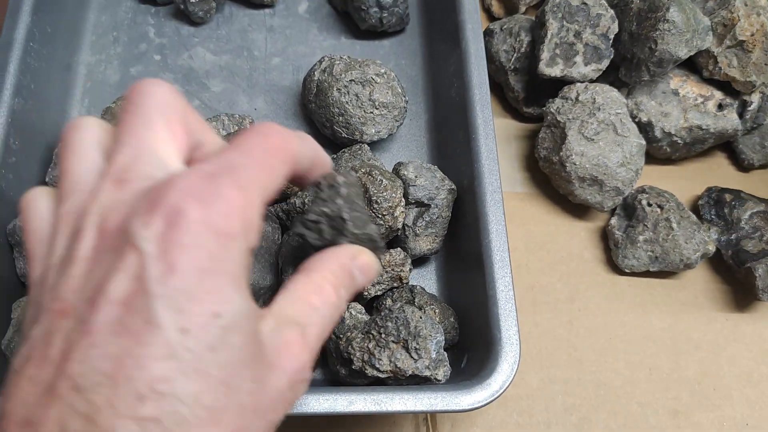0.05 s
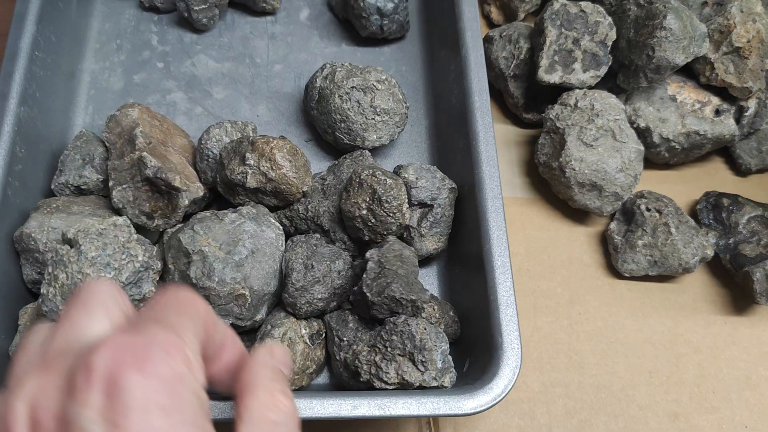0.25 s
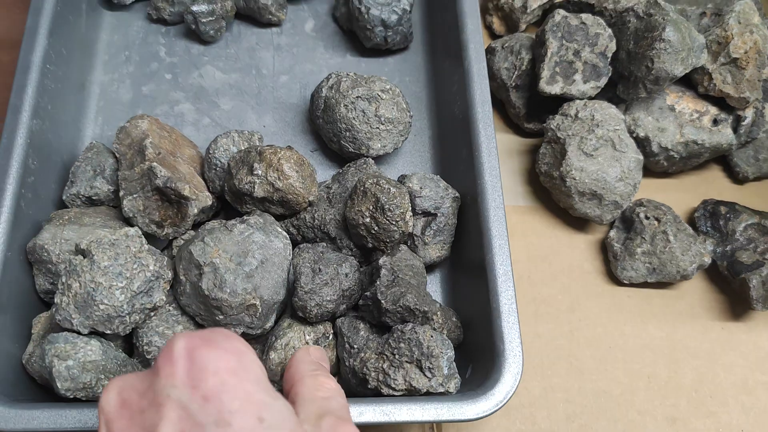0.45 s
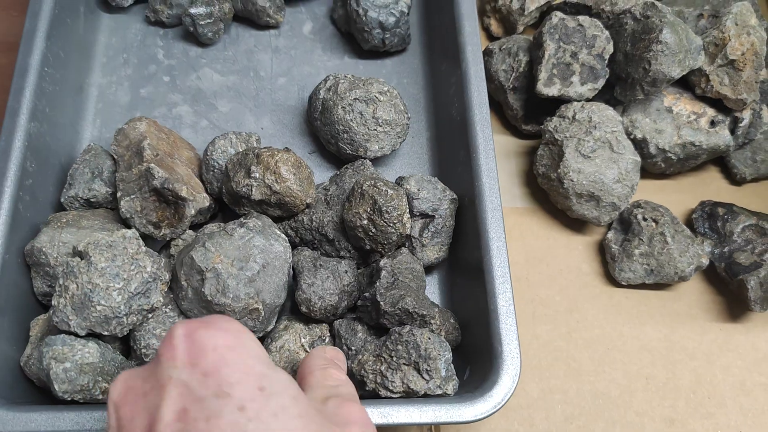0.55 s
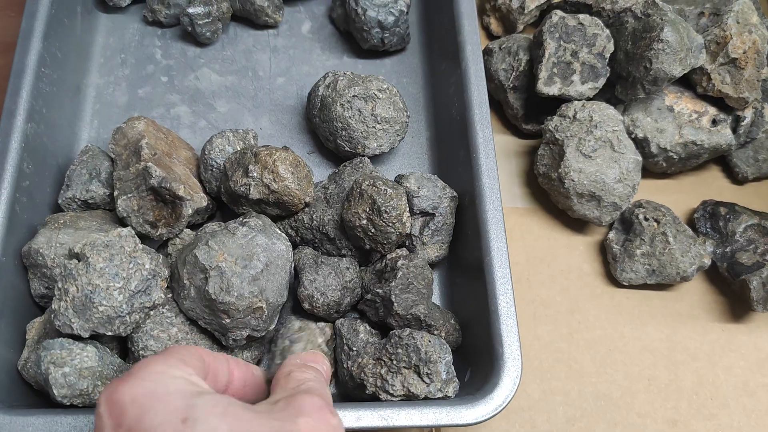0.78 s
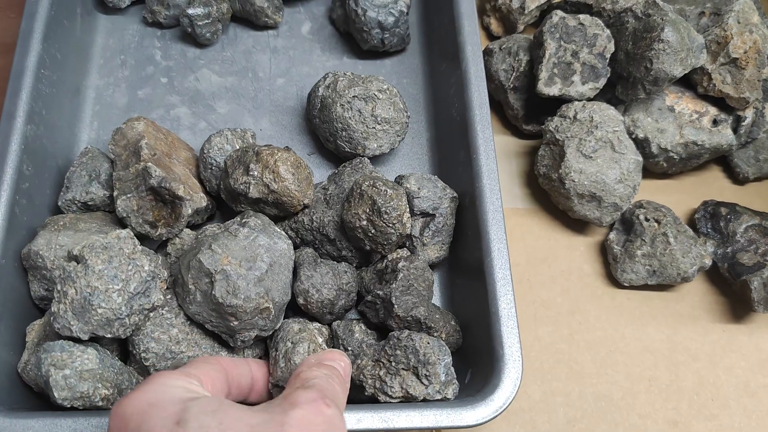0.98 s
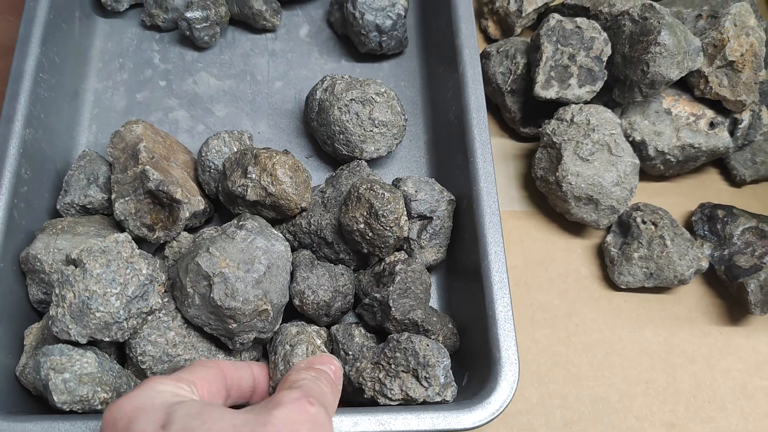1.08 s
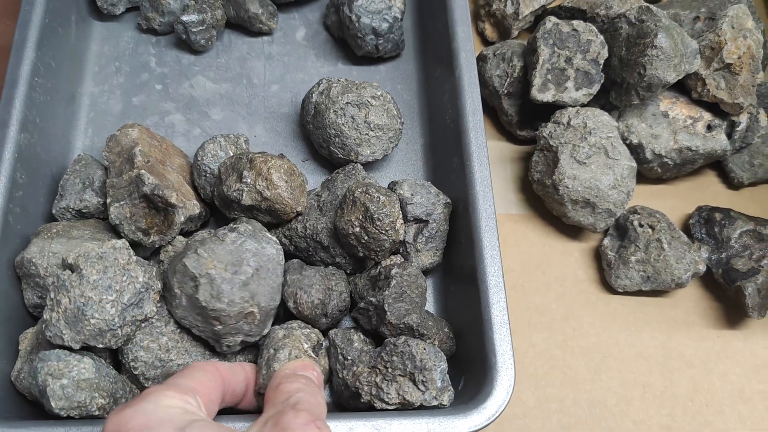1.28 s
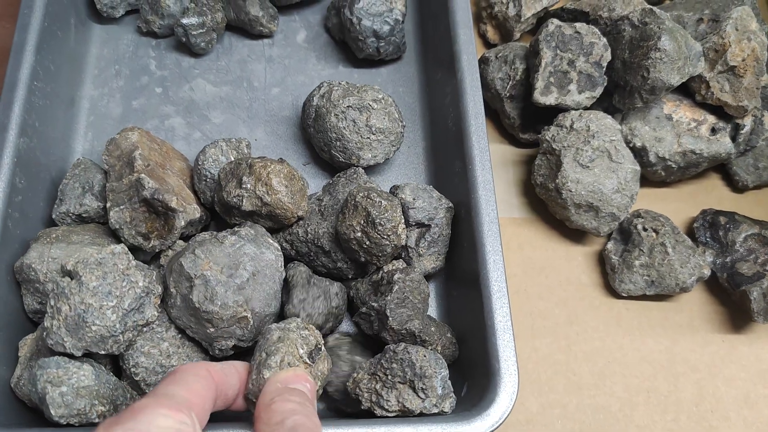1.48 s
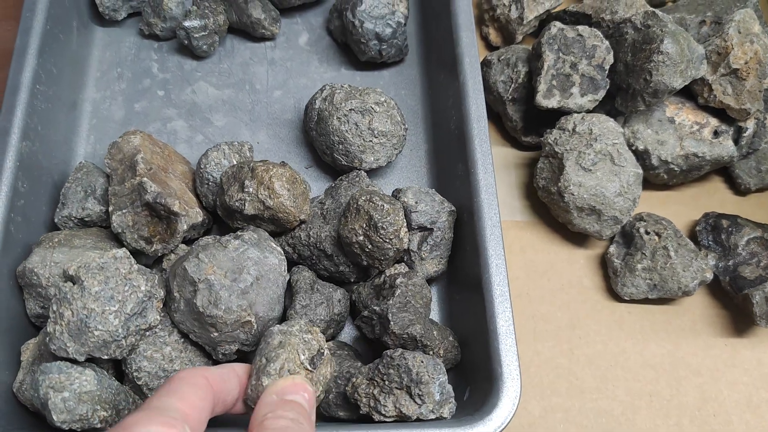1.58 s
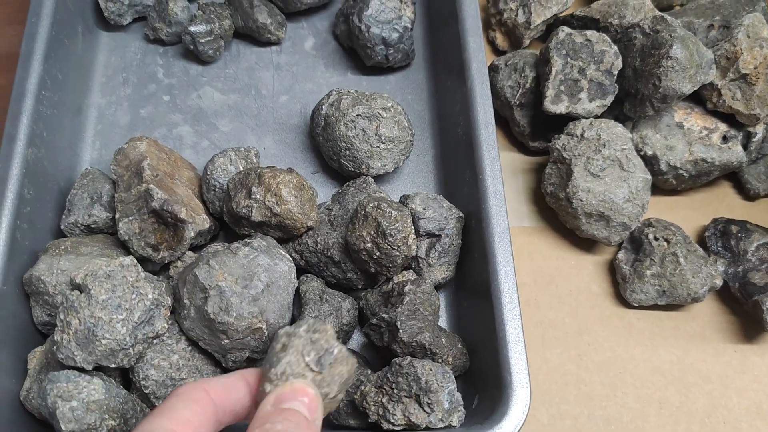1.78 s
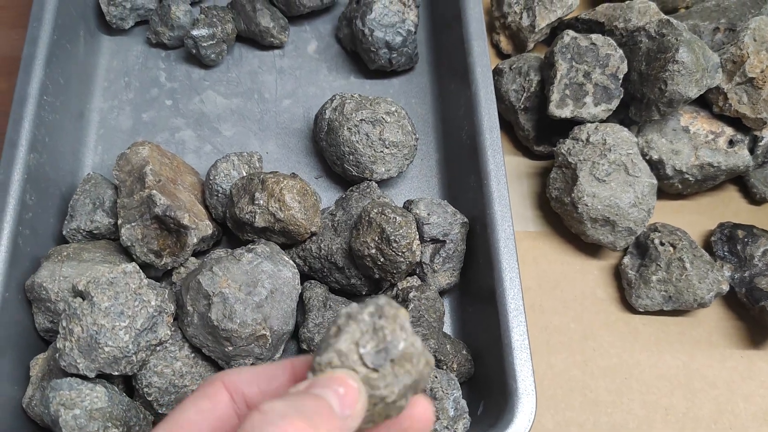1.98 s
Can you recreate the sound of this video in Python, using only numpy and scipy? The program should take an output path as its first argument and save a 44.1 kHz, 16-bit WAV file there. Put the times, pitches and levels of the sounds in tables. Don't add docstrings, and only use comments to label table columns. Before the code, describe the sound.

Stones clatter in a metal tray: a hard double clack near the start, smaller knocks and gritty scrapes, a quiet stretch, then another sharp clack near the end; close phone microphone in a quiet room.

```python
import sys
import numpy as np
from scipy import signal
from scipy.fft import rfft, irfft, next_fast_len
from scipy.io import wavfile
from scipy.ndimage import map_coordinates

SR = 44100
rng = np.random.default_rng(int(sys.argv[2]) if len(sys.argv) > 2 else 0)


def file_out(sig):
    cols = np.atleast_2d(sig).T
    lim = np.clip(cols, -1, 1)
    pcm = np.round(lim * 32767).astype(np.int16)
    wavfile.write(sys.argv[1], SR, pcm)


def invert_db(x):
    u = np.asarray(x, float) / 20
    return 10 ** u


N = 90404


def unit(x):
    return x / np.sqrt(np.mean(x ** 2) + 1e-20)


def along(points, hz):
    f, value = np.transpose(points)
    return np.interp(np.log(hz + 1), np.log(f + 1), value)


def filtered(x, response):
    n = x.shape[-1]
    padded = next_fast_len(n + 8192)
    hz = np.fft.rfftfreq(padded, 1 / SR)
    return irfft(rfft(x, padded) * response(hz), padded)[..., :n]


def coloured(x, points):
    return filtered(x, lambda hz: invert_db(along(points, hz)))


def resonance(f, centre, width):
    return 1j * f * width / (centre ** 2 - f * f + 1j * f * width)


def resonant(x, modes):
    def response(f):
        return sum((-1) ** k * invert_db(db) * resonance(f, centre, width)
                   for k, (centre, width, db) in enumerate(modes))
    return filtered(x, response)


def pair(shape, alike):
    noise = rng.standard_normal(shape[:-1] + (3, shape[-1]))
    return np.sqrt(alike) * noise[..., :1, :] + np.sqrt(1 - alike) * noise[..., 1:, :]


def dying(count, colour, decay, alike):
    noise = coloured(pair((count, SR // 4), alike), colour)
    hz, t, z = signal.stft(noise, SR, nperseg=128)
    z = z / np.sqrt(2 * np.mean(np.sum(abs(z) ** 2, axis=-2)) / 1.5)
    fade = invert_db(-60 * t / along(decay, hz)[:, None])
    return signal.istft(z * fade, SR, nperseg=128)[1][..., :SR // 4]


def strokes(rows, peak_at=0.95):
    t = np.arange(N) / SR
    gain = 0
    for start, length, db in rows:
        swell = np.sin(np.pi * np.clip((t - start) / length, 0, 1) ** peak_at)
        gain = gain + invert_db(db) * (swell ** 2) ** (1.24 / 2)
    return gain


def contacts(per_s, spread_db):
    hit, size, sign = rng.random((3, N))
    strength = invert_db(-spread_db * np.log(size + .02))
    return unit((hit < per_s / SR) * strength * np.sign(sign - .5))


# (frequency [Hz], level [dB per Hz])
FLOOR_COLOUR = [(18, -7.5), (45, -13.5), (100, -20), (190, -21), (400, -25.5), (560, -38.5), (2500, -39.5),
                (9000, -56), (14500, -47)]
# (frequency [Hz], likeness [0-1])
FLOOR_LIKENESS = [(35, 0), (90, .9), (300, .5), (640, 0)]


def floor():
    def mid_and_side(hz):
        turn = np.arccos(np.clip(along(FLOOR_LIKENESS, hz), -1, 1)) / 2
        return invert_db(along(FLOOR_COLOUR, hz)) * np.array([np.cos(turn), np.sin(turn)])
    mid, side = filtered(rng.standard_normal((2, N)), mid_and_side)
    rows = np.repeat([[0], [1]], N, 1)
    steps = np.tile(np.arange(N) * 12 / SR, (2, 1))
    sway_db, sway_rad = map_coordinates(rng.standard_normal((2, 40)), [rows, steps]) * [[1.5], [.4]]
    phase = 2 * np.pi * 187 * np.arange(N) / SR + sway_rad
    hum = invert_db(-66 + sway_db) * np.sqrt(2) * np.sin(phase)
    return invert_db(-57) * unit(np.array([mid + side, mid - side])) + hum


def room(x):
    t60_s = 0.29
    colour = [(100, -14.5), (500, -7.5), (3000, -10), (10000, -11.5)]
    tail = dying(1, colour, [(300, t60_s), (8000, 0.64 * t60_s)], 0.19)[0]
    delayed = np.pad(x.mean(0), (300, 0))[None]
    return signal.fftconvolve(delayed, tail / np.linalg.norm(tail[0]), axes=1)[:, :N]


# (time [s], level [dB], dull thud over the note [dB])
TABLE_BUMPS = [
    (.22, -40, -7),
    (0.284, -35, 1.5),
    (0.407, -59, 16),
    (0.549, -43.5, 6.5),
    (0.701, -55, 9),
    (0.932, -53.5, 11),
    (1.089, -46, -2.5),
    (1.617, -41, -3),
    (1.658, -46, 5),
    (1.768, -50.5, -2),
]


def bumps():
    start, db, dull_db = np.transpose(TABLE_BUMPS)[:, :, None]
    t = np.maximum(np.arange(N) / SR - start, 0)
    note = invert_db(-60 * t / 0.28) * np.sin(2 * np.pi * 163.9 * t)
    dull = invert_db(dull_db - 60 * t / 0.11) * np.sin(2 * np.pi * 89.3 * t)
    rise = 1 - np.exp(-t / 0.0081)
    return np.sum(invert_db(db) * rise * (note + dull), axis=0)


# (time [s], length [s], level [dB], pitch [Hz])
BOTTOM_BOOMS = [
    (0.271, 0.043, -31, 570),
    (1.484, 0.14, -49.5, 597),
    (1.651, 0.032, -34, 602.5),
    (1.766, 0.02, -38.5, 612.4),
]


def booms():
    t = np.arange(N) / SR
    return sum(strokes([(start, length, db)]) * np.sqrt(2) * np.sin(2 * np.pi * hz * t)
               for start, length, db, hz in BOTTOM_BOOMS)


# (time [s], length [s], level [dB])
GRIT_RUBS = [(.261, 0.045, -36.5), (.277, 0.077, -37), (.41, 0.15, -65.5), (.52, 0.033, -64),
             (.545, 0.037, -44), (.584, 0.024, -46), (.61, 0.014, -51.5), (.675, 0.024, -56),
             (.689, 0.008, -44), (.696, 0.025, -31), (.72, 0.084, -58.5), (.84, 0.066, -60.5),
             (.89, 0.022, -52.5), (.92, 0.07, -49.5), (1.015, 0.074, -50), (1.083, 0.024, -43),
             (1.11, 0.063, -60.5), (1.405, 0.022, -46.5), (1.48, 0.16, -62.5), (1.612, 0.024, -43),
             (1.633, 0.019, -30.5), (1.65, 0.056, -44.5), (1.77, 0.027, -44.5), (1.99, 0.049, -66.5)]
# (frequency [Hz], level [dB per Hz])
GRIT_TONE = [(1760, -33), (3000, -4), (3730, -8), (6710, -10.5), (7400, -9), (12700, -10.5), (16000, -12.5)]


def grit():
    alike = 0.22
    common, left, right = (contacts(per_s=5000, spread_db=4) for _ in range(3))
    crackle = np.sqrt(alike) * common + np.sqrt(1 - alike) * np.array([left, right])
    return strokes(GRIT_RUBS, peak_at=0.53) * unit(coloured(crackle, GRIT_TONE))


# (frequency [Hz], width [Hz], level [dB])
BOTTOM_MODES = [(298, 152, -13), (518, 20, -4.5), (534, 35, -5), (602.4, 41, 1.5), (1020, 88, -1.5)]


def drum(x):
    return resonant(x, BOTTOM_MODES)


CONTACT_S = .0005
TRAY_ALIKE = 0.31
# (frequency [Hz], level [dB per Hz])
TRAY_TONE = [(250, -23.5), (420, 2), (560, 1.5), (750, -4.5), (1600, 0.5), (3200, -2), (5500, -13),
             (9000, -22), (14000, -23.5)]
# (frequency [Hz], t60 [s])
TRAY_RING = [(400, 0.12), (1500, 0.19), (3000, 0.12), (6000, 0.043), (12000, 0.0096)]
# (time [s], length [s], level [dB], bottom drumming over it [dB])
STONE_ROLLS = [(0.254, 0.073, -21.5, -12), (0.27, 0.015, -31.5, -21), (0.318, 0.086, -38, -9),
               (0.422, 0.2, -57.5, -5), (0.509, 0.062, -35, -7.5), (0.561, 0.075, -43.5, -0.5),
               (0.614, 0.13, -51, -2.5), (0.668, 0.14, -57, -11.5), (0.8, 0.19, -50, -3),
               (0.895, 0.077, -35.5, -11.5), (0.948, 0.077, -62.5, 2), (1.016, 0.067, -48, -7),
               (1.073, 0.027, -34, -8.5), (1.096, 0.077, -47, -11), (1.157, 0.094, -56.5, 3),
               (1.257, 0.096, -58, -4.5), (1.334, 0.12, -51, 0), (1.393, 0.097, -41, -4.5),
               (1.462, 0.15, -48, -1), (1.585, 0.096, -38.5, -2.5), (1.641, 0.039, -35, -4.5),
               (1.675, 0.067, -42.5, -7.5), (1.786, .1, -58, -0.5), (.218, 0.026, -38, 2.5),
               (1.771, 0.023, -41, -1), (1.634, 0.034, -50.5, 1)]


def rolling():
    per_s, spread_db = 2400, 2.5
    short_ring = [(hz, .24 * t60) for hz, t60 in TRAY_RING]
    spots = dying(6, TRAY_TONE, short_ring, TRAY_ALIKE)
    spots = spots * np.minimum(np.arange(spots.shape[-1]) / SR / CONTACT_S, 1)
    spots = spots / np.linalg.norm(spots) * np.sqrt(2)
    push = strokes([row[:3] for row in STONE_ROLLS])
    swarm = np.array([push * contacts(per_s / len(spots), spread_db) for _ in spots])
    grind = signal.fftconvolve(swarm[:, None], spots, axes=-1).sum(0)[:, :N]
    shake = contacts(per_s, spread_db)
    drum_push = strokes([(start, length, db + over_db) for start, length, db, over_db in STONE_ROLLS])
    return grind + drum(shake * drum_push) / drum(shake).std()


# (frequency [Hz], level [dB])
EDGE_TONE = [(1500, -5), (2500, -2.5), (4000, 4), (6500, -4.5), (7600, -19.5), (12000, -30.5), (16000, -35)]
# (time [s],
# peak level [dB], sharp edge over it [dB], stone pitch [Hz], t60 while the heap damps the tray [s])
STONE_KNOCKS = [(0.261, -19.5, 0.5, 1860, 0.5), (0.279, -15.5, -3.5, 1560, 0.24),
                (0.355, -23, -42, 1610, 0.14), (0.478, -37, -31, 1200, 0.089),
                (0.526, -29, -26, 1160, 0.15), (0.5348, -21, -13.5, 2550, 0.23),
                (0.5475, -23, -19.5, 2200, 0.052), (0.587, -32, -12, 1300, 0.34),
                (0.639, -34, -32, 1270, 0.34), (0.7, -26.5, -25, 1760, 0.23),
                (0.899, -32.5, -30, 1270, 0.58), (0.909, -30.5, -27.5, 2460, 0.49),
                (0.926, -27, -34, 1230, 0.24), (0.947, -27.5, -26.5, 2300, 0.39),
                (1.085, -24.5, -14, 1590, 0.4), (1.148, -38, -24, 2080, 0.091), (1.189, -40, -40, 1120, 1),
                (1.342, -37, -45, 1100, 0.73), (1.373, -30, -40, 1080, 0.52), (1.385, -28, -28, 1560, 0.18),
                (1.4087, -27, -10.5, 1385, 0.24), (1.437, -36, -3.5, 2030, 0.27),
                (1.493, -41.5, -6.5, 1850, 0.2), (1.658, -19.5, -20.5, 2170, 0.21),
                (1.679, -24.5, -19.5, 1400, 0.25), (1.715, -28, -44, 1420, 0.38),
                (0.218, -19, -0.5, 1540, 0.83),
    (0.2827, -10.5, -11, 1595, 0.024),
    (1.6171, -27.5, -8.5, 1210, 0.19),
    (1.6331, -17.5, -18, 1366, 0.029),
    (1.6372, -11.5, -22.5, 1596, 0.031),
    (1.768, -18.5, -15, 2480, 0.37),
                (.2225, -23.5, -3, 2760, 0.12), (.29, -16, -5, 1610, 0.11), (.297, -17.5, -9, 2300, .12),
               (0.306, -17, -15, 1620, .12), (.322, -22, -9, 1550, 0.11), (0.365, -28.5, -22, 2300, 0.23),
               (.517, -39, -42, 2500, 0.11), (0.543, -24, -11, 1740, .1), (0.559, -35.5, -0.5, 2080, 0.1),
               (0.667, -43, -28, 1480, 0.23), (.845, -40.5, -32, 1230, .2), (0.916, -28.5, -33, 2500, 0.17),
               (.932, -33, -23, 1510, 0.064), (.941, -25.5, -22, 2460, .1), (.954, -31.5, -22, 1900, .12),
               (.974, -38, -30, 1490, 0.13), (1.039, -46, -25, 1510, 0.18),
               (1.2274, -44.5, -37, 1300, 0.33), (1.424, -36, -26, 1990, 0.2),
               (1.553, -43.5, -22, 2600, .2), (1.58, -46, -30, 1470, .2), (1.591, -45, -29.5, 2300, 0.15),
               (1.664, -26.5, -15, 2090, 0.14), (1.704, -32.5, -33, 1400, 0.17),
               (1.738, -33, -35, 1415, .15), (1.7725, -22.5, -17, 1630, 0.13),
               (1.78, -26.5, -23, 2700, 0.25), (1.803, -38.5, -33, 2020, 0.16),
               (1.818, -37, -29.5, 1750, 0.22)]


def knocks():
    rows = np.array(STONE_KNOCKS)
    t = np.arange(SR // 4) / SR
    pitch = rows[:, 3, None, None]
    tint = invert_db(4)
    tray = dying(len(rows), TRAY_TONE, TRAY_RING, TRAY_ALIKE)
    tray = filtered(tray, lambda f: 1 + tint * resonance(f, pitch, .8 * pitch)) / tint
    edge = unit(coloured(pair((len(rows), len(t)), TRAY_ALIKE), EDGE_TONE)) * invert_db(-60 * t / 0.024)
    thump = drum(np.eye(1, len(t))[0])
    thump = thump / thump.max()
    stone_env = invert_db(-60 * t / .012) * (1 - np.exp(-t / .0006))
    out = np.zeros((2, N + SR))
    for k, (start, db, edge_db, stone_hz, damp_s) in enumerate(rows):
        stone = stone_env * np.sin(2 * np.pi * stone_hz * t)
        metal = (invert_db(-8) * tray[k] + invert_db(-22.5) * thump) * invert_db(-60 * t / damp_s)
        knock = metal + invert_db(6.5) * stone + invert_db(4.5 + edge_db) * edge[k]
        speed = invert_db(.35 * edge_db)
        build = np.sin(np.pi / 2 * np.minimum(t / CONTACT_S * speed, 1)) ** 2
        first = round(start * SR)
        out[:, first:first + len(t)] += invert_db(db) * knock * build
    return out[:, :N]


# (frequency [Hz], width [Hz], level [dB])
CLEAR_MODES = [(840, 15, -3), (1011, 7.3, 7.5), (1176, 14, 0.5), (1290, 8.3, -0.5), (1555, 17, -12),
               (1683, 15, 10.5), (2030, 35, 0.5), (2300, 21, 1.5), (2500, 13, -13.5), (2860, 43, 0),
               (2917, 21, 1.5), (3610, 35, 4.5), (4170, 12, -15)]
# (frequency [Hz], level of the difference [dB])
PORT_WIDTH = [(700, -5.5), (1300, 1)]
# (frequency [Hz], left over right [dB])
PORT_LEAN = [(300, 0), (700, -0.3), (1400, -3), (2800, .5), (8000, 2), (14000, 1.5)]


def at_ports(near):
    def response(hz):
        level = invert_db(along(PORT_LEAN, hz) * np.array([[.5], [-.5]]))
        delay_s = np.array([[0], [0.000098]])
        return level * np.exp(-2j * np.pi * hz * delay_s) * (1j * hz / (1j * hz + 40)) ** 2
    return filtered(near, response)


def scene():
    tray = knocks() + rolling()
    tray = tray + invert_db(-6.5) * resonant(tray, CLEAR_MODES)
    side = coloured((tray[0] - tray[1]) / 2, PORT_WIDTH)
    near = tray.mean(0) + side * [[1], [-1]]
    near = at_ports(near + booms() + grit() + bumps())
    return near + invert_db(-13) * room(near) + floor()


def low_pass(x):
    return signal.sosfilt(signal.butter(12, 16970, fs=SR, output="sos"), x)


def record(dry):
    limited = dry / (1 + (dry / .8) ** 4) ** (1 / 4)
    mix = filtered(limited, lambda hz: hz < 15900)
    return low_pass(mix)


dry = scene()
out = record(dry)
file_out(out)
```